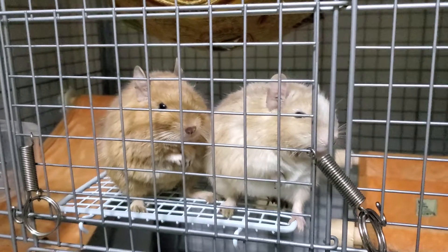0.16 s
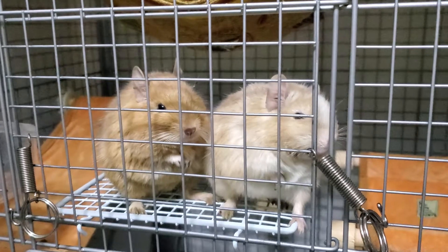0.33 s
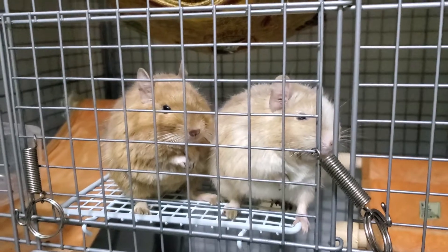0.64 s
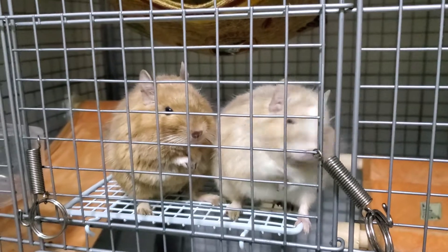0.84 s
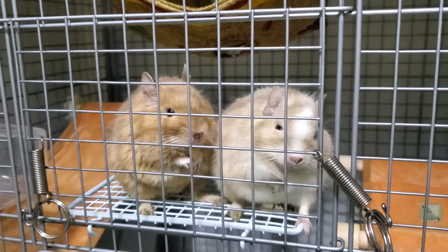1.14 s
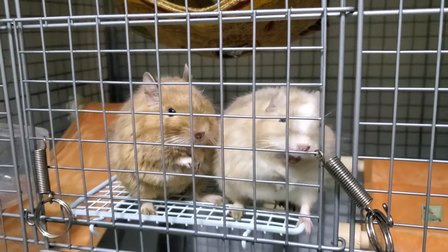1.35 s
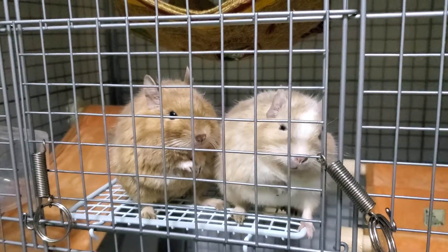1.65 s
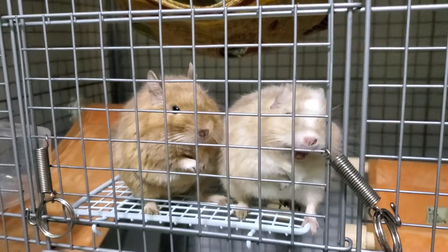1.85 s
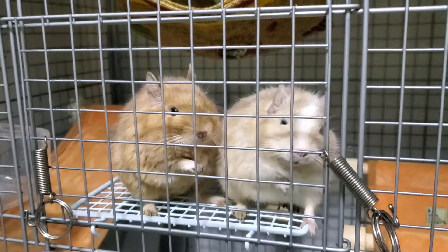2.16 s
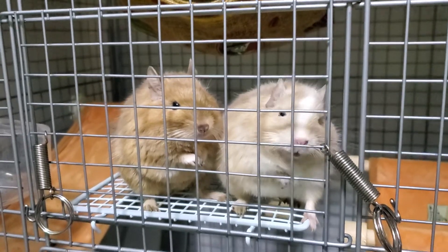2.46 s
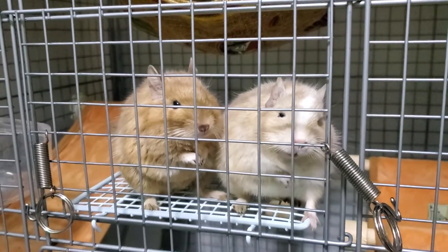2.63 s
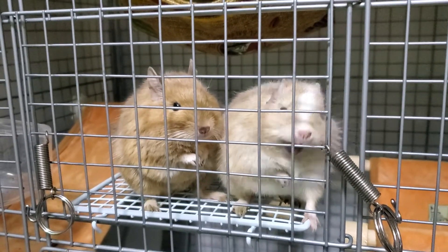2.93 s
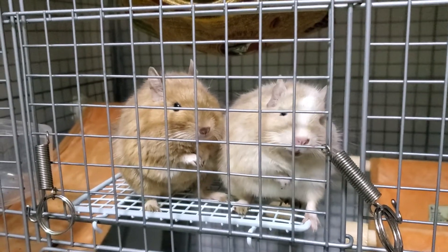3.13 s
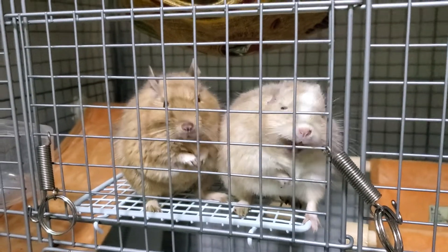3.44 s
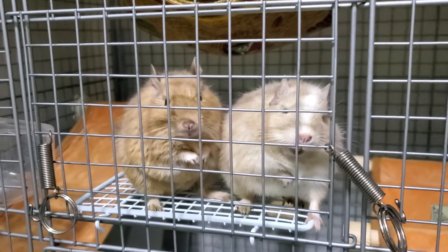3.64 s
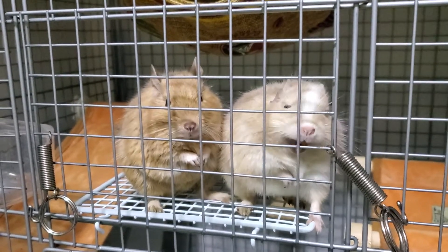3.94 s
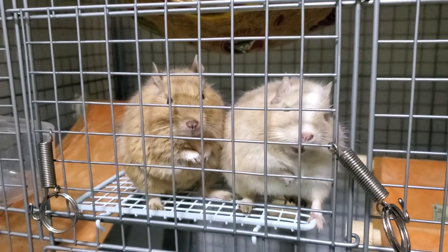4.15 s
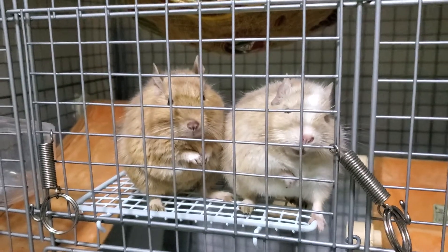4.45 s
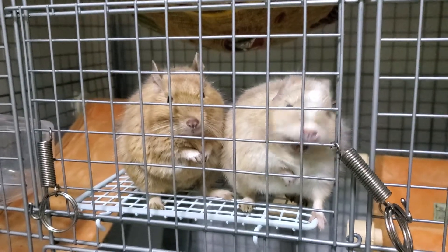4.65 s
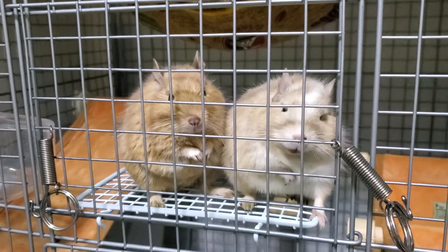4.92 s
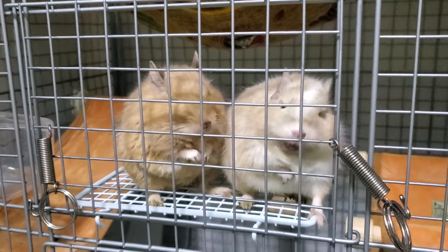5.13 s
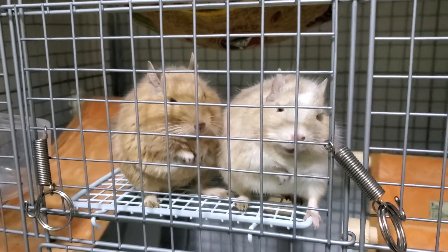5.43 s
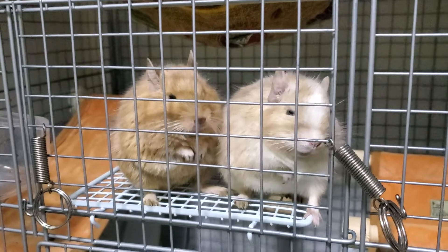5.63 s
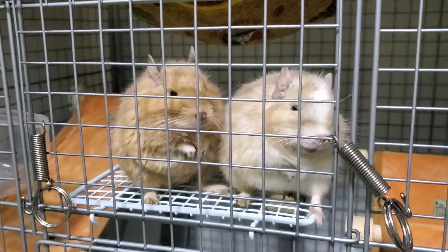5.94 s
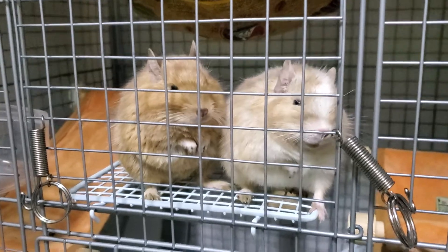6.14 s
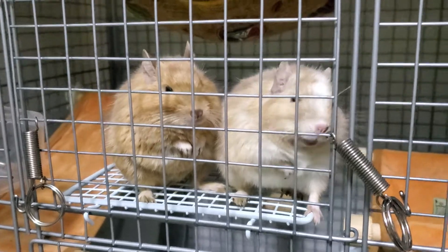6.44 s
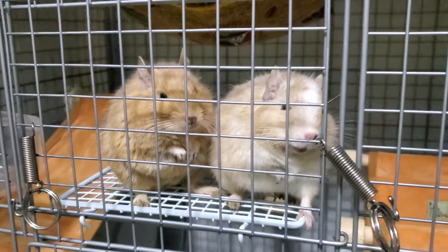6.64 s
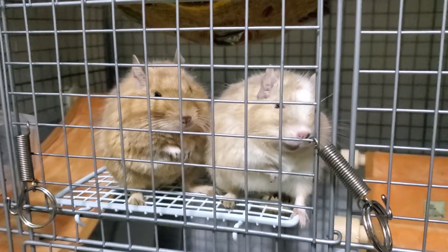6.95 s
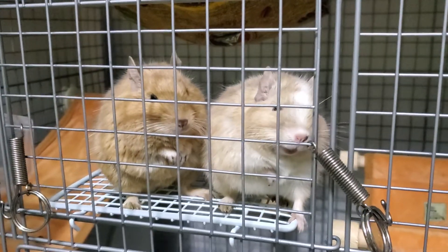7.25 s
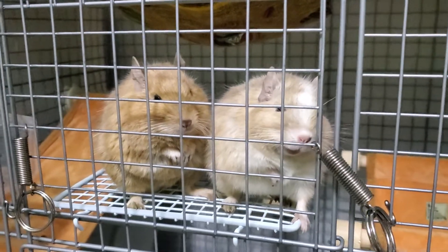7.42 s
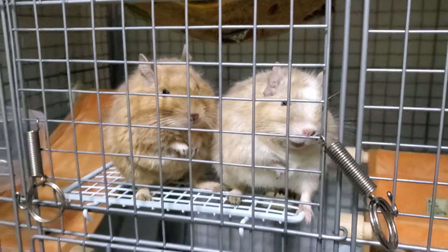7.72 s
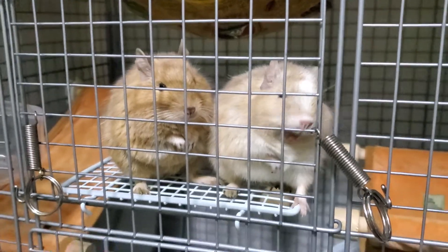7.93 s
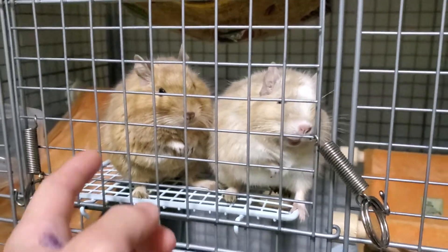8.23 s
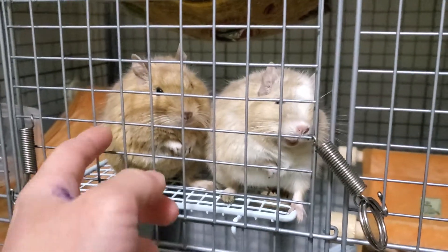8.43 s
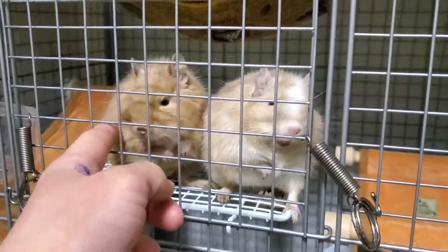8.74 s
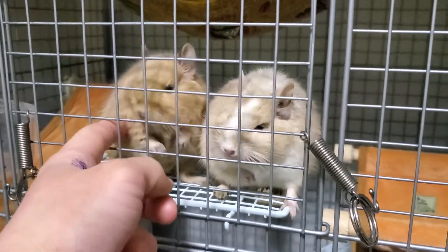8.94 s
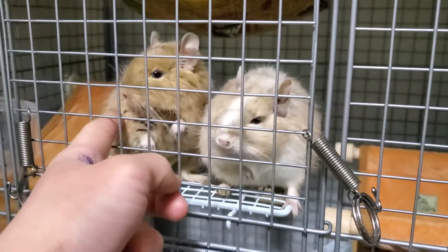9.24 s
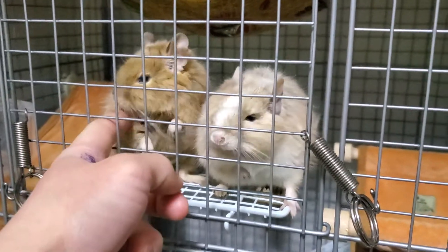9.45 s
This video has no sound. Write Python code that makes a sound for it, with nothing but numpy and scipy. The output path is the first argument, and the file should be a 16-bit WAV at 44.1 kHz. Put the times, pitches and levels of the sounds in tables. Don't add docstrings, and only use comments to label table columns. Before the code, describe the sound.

A small furry rodent in a wire cage squeaks again and again, close to a phone in a small room. Each squeak is a very short, high chirp that sweeps up, cracks roughly, whistles and drops, with a brief metallic and room echo. Between them come light claw ticks, soft shelf bumps, paw shuffling early on and slight fur rustles. A low mains hum and faint fan hiss run throughout.

```python
import sys
import numpy as np
from scipy import signal
from scipy.fft import rfft, irfft, next_fast_len
from scipy.io import wavfile
from scipy.ndimage import uniform_filter1d, map_coordinates

SR = 44100
rng = np.random.default_rng(int(sys.argv[2]) if len(sys.argv) > 2 else 0)


def master(y):
    cut = np.clip(np.atleast_2d(y).T, -1, 1)
    pcm = np.round(cut * 32767)
    wavfile.write(sys.argv[1], SR, pcm.astype(np.int16))


def gain_from_decibels(decibels):
    exponent = np.asarray(decibels, float) / 20
    return 10 ** exponent


N = 422478

# (start [s], sweep [s], hold [s], drop [s], bend of the sweep [power])
CALLS = [(-0.045, 0.043, 0.025, 0.04, 1.08), (0.743, 0.051, 0.024, 0.031, 1.02),
         (1.29, 0.0526, 0.036, 0.026, 0.66), (1.797, 0.038, 0.045, 0.028, 0.76),
         (2.267, 0.0331, 0.051, 0.022, 1.07), (2.933, 0.054, 0.035, 0.026, 0.65),
         (3.431, 0.048, 0.055, 0.021, 0.6), (3.922, 0.033, 0.057, 0.026, 0.86),
         (4.658, 0.047, 0.047, 0.022, 1.04), (5.133, 0.032, 0.071, 0.026, 0.83),
         (5.7385, 0.045, 0.061, 0.019, 0.62), (6.318, 0.039, 0.051, 0.022, 1.07),
         (6.978, 0.027, 0.078, 0.017, 1.08), (7.96, 0.035, 0.059, 0.04, 0.55),
         (8.543, 0.036, 0.051, 0.035, 0.94), (9.303, 0.032, 0.063, 0.018, 0.75)]
# (start [Hz], top of the sweep [Hz], mid hold [Hz], end of hold [Hz], last [Hz])
PITCHES = [(2400, 4530, 4510, 4630, 3430), (2666, 4830, 4370, 4610, 3530), (1760, 4920, 4750, 5080, 4010),
           (1870, 4510, 4570, 4770, 3820), (2580, 4670, 4970, 5430, 4500), (1587, 4770, 4340, 4850, 3440),
           (1480, 4190, 4440, 4280, 3300), (2003, 4150, 4620, 5120, 4100), (2308, 3800, 3750, 4300, 3300),
           (1840, 4050, 4120, 4730, 3600), (2280, 5000, 5030, 4960, 3700), (2230, 4830, 4930, 4860, 4180),
           (2174, 4100, 4620, 4700, 3400), (1887, 3980, 4320, 4420, 3200), (1595, 4260, 4140, 4440, 3340),
           (1876, 3800, 4620, 4740, 3470)]
# (depth [share of pitch, 0-1], period [s], first crest after the sweep [s])
QUAVERS = [(0.03, 0.015, 0.014), (0.033, 0.031, 0.0109), (0.01, 0.018, 0.00061), (0.02, 0.0191, 0.0104),
           (0.02, 0.035, 0.0199), (0.05, 0.0285, 0.0168), (0.03, 0.023, 0.0101), (0.02, 0.0223, -0.0075),
           (0.02, 0.0222, -0.0123), (0.012, 0.035, 0.031), (0.01, 0.032, -0.013), (0.022, 0.0302, 0.017),
           (0.02, 0.0321, -0.0044), (0.02, 0.024, 0.0311), (0.012, 0.018, 0.0128), (0.03, 0.032, 0.012)]
# (sweep [dB], top of the sweep [dB], mid hold [dB], end of hold [dB])
EFFORTS = [(-36, -25.5, -32.5, -29.5), (-25, -29, -26, -27.5), (-31.5, -27.5, -28.5, -23.5),
           (-26.5, -27.5, -26.5, -25.5), (-26.5, -23, -23, -15.5), (-27.5, -28.5, -27, -26.5),
           (-29, -27, -27, -28.5), (-26.5, -24, -21.5, -22), (-26, -19.5, -19, -24),
           (-29.5, -25.5, -24, -24), (-33, -23, -21, -23.5), (-31, -30, -27, -26.5),
           (-29, -27.5, -21, -25.5), (-28.5, -23, -25.5, -28), (-27, -24, -26, -27),
           (-31, -25.5, -25.5, -26.5)]
# (time after the start [s], gain [dB], width [s])
PUSHES = [(.07, 2.5, 0.00803), (.02, 1, 0.01), (0.019, 5, 0.0028), (0.025, 2.5, .006), (.085, 1, .006),
          (.025, 2, .008), (0.027, 5, .008), (.05, 2.5, .008), (0.0229, 2.5, .006), (0.0615, 2.5, .008),
          (0.074, -3.5, 0.006), (0.055, 6.5, .009), (.045, 4, 0.012), (.022, 5.5, .004),
          (0.026, -0.5, 0.0091), (0.078, 2, 0.0074)]
# (start [s], end [s], noise share [dB], second voice [Hz], its level [dB])
VOICE_BREAKS = [(-.01, 0.022, -9, 5960, -28.5), (.735, 0.774, -3.5, 5700, -12),
                (1.306, 1.327, -7.5, 5700, -22.5), (1.805, 1.815, 2, 5670, -13),
                (2.283, 2.302, 2.5, 5410, -5), (2.936, 2.967, -2.5, 5610, -26),
                (3.426, 3.461, -12, 5670, -16.5), (3.95, 3.984, -0.5, 5274, 2),
                (4.65, 4.739, -1, 5020, -8.5), (5.145, 5.188, -2, 5190, -9), (5.766, 5.786, -1, 5600, 1),
                (6.319, 6.354, -13, 5710, -29), (7.006, 7.052, -2, 5370, 6),
                (7.967, 8.009, -6.5, 6470, -2.5), (8.548, 8.586, 1, 5670, -29),
                (9.323, 9.358, -1, 5930, -13)]
# (depth [share of pitch, 0-1], lets go before the break ends [s])
DRAGS = [(0.01, .003), (0, .003), (.003, .003), (0, .003), (.06, 0.0036), (.003, .003), (0.01, .003),
         (.11, .01), (0.01, .003), (0.01, 0.00308), (.1, .007), (.003, .003), (.16, 0.00092),
         (0.01, 0.0032), (.003, .003), (0.02, 0.0034)]
# (second [dB], third and up [dB], loss per overtone before the mouth opens [dB], half-pitch strands [dB])
OVERTONE_LEVELS = [(0, 0, -1.5, -1.5), (0.5, -3, 1.5, 1), (1, 1, 4.5, -10.5), (1.5, 0.5, 1, -5),
                   (-0.5, -3, 3, -5), (1, 1, 4, -10), (3.5, 2, 0.5, 1.5), (1, -0.5, 3.5, -6),
                   (0.5, -3, 5, -1.5), (0.5, -2, 1.5, -6.5), (-.5, -2, 6, -3), (-1, -4, 6, -2),
                   (-1.5, 0, 6.5, -0.5), (1.5, 2.5, 3, 1), (-3, 1.5, 6, -8.5), (4, -1, 6, -0.5)]
CROAK_DB = [-23.5, -32.5, -37, -27.5, -44.5, -26.5, -36, -40, -29.5, -38.5, -46, -40, -53, -30, -26, -42]
CHEST_RESONANCES = [1800, 1900, 1803, 1800, 1800, 1750, 2100, 1750, 1250, 1900, 1700, 1800, 1850, 1630,
                    1720, 2100]
# (left-right [dB], left leads [microseconds], brightness [dB per octave])
HEAD_TURNS = [(-.5, -5, -2), (-.5, -25, -1.5), (.5, 0.46, -2), (0, -8, -2.5), (0, 0.5, -1), (.5, 3, -2),
              (.5, 1.5, -3), (.5, 0.5, -0.5), (0, -4, 0.5), (0, 0.5, -1), (0, -8, -2.5), (-.5, -11, -1.5),
              (-.5, 16, -2), (-1, 5, -1), (0, 21, -2.5), (2.5, 52, -2)]
# (frequency [Hz], gain [dB])
MOUTH_AND_THROAT = [(900, -46), (1800, -27), (3100, -15.5), (3800, -9.5), (5000, -4.5), (6200, 0),
                    (7400, -3), (8300, -5.5), (9500, -8), (11300, -3), (12700, -4.5), (15500, -8.5),
                    (19000, -9)]
# (frequency [Hz], left-right [dB], left leads [radians])
MIC_PORTS = [(2700, .5, -.2), (3600, 3, -.1), (5000, .5, .35), (5850, -2, 1.1), (7000, .5, 1.05),
             (8200, 4.5, 1.3), (10100, 4.5, 2.5), (11800, 1.5, 2.7), (14500, 3.5, 3.8)]
# (frequency [Hz], time to die by 60 dB [s])
CAGE_DECAY = [(3000, 0.097), (14000, 0.058)]
# (frequency [Hz], time to die by 60 dB [s])
WALL_DECAY = [(1000, 0.3), (5000, 0.26), (15000, 0.23)]
# (time [s], peak level [dB], tilt [dB per octave])
CLAW_AND_LIP_TICKS = [(1.2858, -55.5, -14), (0.65, -58, -4.5), (2.714, -60.5, -9), (2.736, -50, -12),
                      (2.7615, -37, -6), (3.412, -63.5, -2), (3.899, -58, -14), (4.343, -48, -12),
                      (4.408, -57, -10.5), (4.642, -60.5, -9), (5.103, -61.5, -15.5), (6.966, -69, -10.5),
                      (7.9312, -45.5, -6), (6.302, -68, -6), (5.66, -66, -4), (8.678, -60, -10),
                      (1.2, -64, -12), (1.8, -63, -17), (7.957, -49, -8)]
# (time [s], peak level [dB], pitch of the thud [Hz])
SHELF_BUMPS = [(0.753, -49, 436), (3.088, -53.5, 317), (3.147, -52, 320), (3.545, -57.5, 420),
               (3.999, -51, 339), (4.085, -61, 409), (4.72, -50.5, 490), (5.214, -53.5, 349.5),
               (6.399, -61, 330), (8.05, -54.5, 350), (8.617, -49.5, 340), (1.7, -43.5, 59),
               (2.34, -45.5, 65.2), (3.68, -53.5, 70), (7.04, -44.5, 53), (4.72, -47, 62),
               (2.95, -46.5, 104), (3.3, -52, 120), (6.38, -47.5, 64), (8.56, -46, 60), (9.34, -45, 60),
               (8.02, -47, 62), (5.8, -49.5, 62), (4.0, -50, 70)]
# (time [s], level [dB])
PAW_STROKES = [
    [(2.5, -83), (2.81, -64), (2.92, -83)],
    [(2.9, -71.5), (3.13, -66.5), (3.3, -82.5), (3.6, -72)],
    [(4.25, -76), (4.374, -72.5), (4.5, -77)],
]
# (frequency [Hz], level [dB per Hz])
PAW_COLOUR = [(88, -41), (150, 18), (352, -38), (381, 0), (490, -2), (3100, -4.5), (15500, -36)]
# (time [s], level [dB])
FUR_STROKES = [
    [(4.3, -95), (4.354, -66.5), (4.45, -86)],
    [(7.35, -102), (7.5, -75), (7.62, -74.5), (7.68, -82), (7.92, -88)],
    [(8.8, -89), (8.88, -90), (8.95, -99)],
]
# (frequency [Hz], level [dB per Hz])
FUR_COLOUR = [(2650, -31), (4500, -4), (5620, -3), (7430, -10), (11000, -1.5), (15500, -9)]
# (frequency [Hz], level [dB])
HUM_LINES = [(58.2, -57), (100, -62.5), (150, -72.5), (175, -72.5), (200, -69), (250, -70.5), (325, -78.5),
             (350, -73), (400, -83.5), (450, -82), (500, -72), (650, -83), (800, -80), (1394, -86)]
# (time [s], load [dB])
MOTOR_LOAD = [(0.0, 5), (0.59, -2.5), (1.12, 4.5), (2.0, -2.5), (2.8, 2.5), (4.64, -1.5), (6.72, -2.5),
              (8.38, 2), (9.58, -5.5)]
# (frequency [Hz], level [dB per Hz])
DRONE_COLOUR = [(24, -30.5), (40, 2.5), (88, -1), (146, -11.5), (343, -17), (416, -23.5), (497, -27.5),
                (557, -20), (794, -23.5), (996, -33.5), (1900, -34), (2470, -72), (4180, -120)]
# (frequency [Hz], level [dB per Hz])
FAN_COLOUR = [(880, -41.5), (1500, -19.5), (1970, -19), (2640, -0.5), (3380, -5), (3580, -12.5),
              (4230, -16), (5670, -26), (8290, -31), (12300, -23.5), (15500, -26)]
# (frequency [Hz], likeness [-1 to 1])
PORT_LIKENESS = [(60, 0.92), (130, 0.8), (290, 0.6), (640, 0.35), (1410, -0.21), (3100, 0.14), (6820, 0.04),
                 (15000, -0.0)]
# (frequency [Hz], left-right [dB])
PORT_BALANCE = [(60, 0.5), (150, 1.5), (380, 5.0), (950, 8.5), (2380, -2.0), (5980, 2.0), (15000, 1.0)]

TOP_HZ = 15850
SMOTHER_HZ = 3720


def unit(x):
    return x / np.sqrt(np.mean(x ** 2) + 1e-20)


def along(points, hz, col=1):
    rows = np.transpose(points)
    return np.interp(np.log(hz + 1), np.log(rows[0] + 1), rows[col])


def curves(rows, t):
    s, *cols = np.transpose(rows)
    return [np.interp(t, s, c) for c in cols]


def wobble(rate, size=N):
    knots = rng.standard_normal(int(size * rate / SR) + 4)
    return map_coordinates(knots, [np.arange(size) * rate / SR])


def filtered(x, response):
    m = next_fast_len(x.shape[-1] + 4096)
    spectrum = rfft(x, m) * response(np.fft.rfftfreq(m, 1 / SR))
    return irfft(spectrum, m)[..., :x.shape[-1]]


def spread(db, lead):
    half = gain_from_decibels(db / 2) * np.exp(.5j * lead)
    return np.array([half, 1 / half])


def add(track, x, s):
    at = round(s * SR)
    x = x[:, max(-at, 0):]
    part = track[:, max(at, 0):][:, :x.shape[1]]
    part += x[:, :part.shape[1]]


def rush(spectrum, patchy_db):
    z = signal.stft(rng.standard_normal((2, N)), nperseg=512)[2]
    field = uniform_filter1d(rng.standard_normal(z.shape[1:]), 6, 0)
    field = uniform_filter1d(field, 12, 1)
    pair = signal.istft(z * gain_from_decibels(patchy_db * unit(field)), nperseg=512)[1][:, :N]

    def mid_side(hz):
        turn = np.arccos(np.clip(along(PORT_LIKENESS, hz), -1, 1)) / 2
        return gain_from_decibels(along(spectrum, hz)) * [np.cos(turn), np.sin(turn)]

    mid, side = filtered(pair, mid_side)
    both = np.array([mid + side, mid - side])
    both = filtered(both, lambda hz: spread(along(PORT_BALANCE, hz), 0))
    return both / np.sqrt(np.mean(both.mean(0) ** 2))


def tail(decays, seconds, wait):
    hz, t, z = signal.stft(rng.standard_normal((2, int(seconds * SR))), SR, nperseg=64)
    dying = gain_from_decibels(-60 * t / along(decays, hz)[:, None])
    echo = signal.istft(z * dying, SR, nperseg=64)[1]
    return np.pad(echo / np.linalg.norm(echo[0]), ((0, 0), (int(wait * SR), 0)))


def rodent():
    out = np.zeros((2, N))
    for call, pitch, quaver, effort, push, broken, drag, overtones, croak_db, chest_hz, head in zip(
            CALLS, PITCHES, QUAVERS, EFFORTS, PUSHES, VOICE_BREAKS, DRAGS, OVERTONE_LEVELS,
            CROAK_DB, CHEST_RESONANCES, HEAD_TURNS):
        start = call[0]
        pan_db, lead_us, bright_db = head
        t, hz, db = contour(call, pitch, quaver, effort, push)
        voice = squeal(t, hz, db, broken, bright_db, croak_db, overtones, drag, chest_hz)

        def ports(f):
            lead = along(MIC_PORTS, f, col=2) + 2 * np.pi * f * lead_us / 10 ** 6
            return spread(along(MIC_PORTS, f) + pan_db, lead)

        direct = filtered(voice, ports)
        cage = signal.fftconvolve(voice[None], tail(CAGE_DECAY, .15, wait=.002), axes=1)
        walls = signal.fftconvolve(voice[None], tail(WALL_DECAY, 0.82, wait=.006), axes=1)
        add(out, direct, start)
        add(out, gain_from_decibels(-11) * direct, start + .0075)
        add(out, gain_from_decibels(-6.5) * cage, start)
        add(out, gain_from_decibels(-23.0) * walls, start)
    return out


def contour(call, pitch, quaver, effort, push):
    start, sweep, hold, drop, bend = call
    depth, period, lag = quaver
    first, top, middle, crest, last = pitch
    s = np.arange(0, sweep + hold + drop, 1 / SR)
    up = np.clip(s / sweep, 0, 1)
    held = np.clip((s - sweep) / hold, 0, 1)
    down = np.clip((s - sweep - hold) / drop, 0, 1)
    hz = first + (top - first) * up ** bend + (crest - top) * held
    hz -= (crest - last) * down ** 1.45
    hz += (middle - (top + crest) / 2) * 4 * held * (1 - held)
    hz *= 1 + depth * up ** 4 * (1 - down) * np.cos(2 * np.pi * (s - sweep - lag) / period)
    attack_s, attack_db = .013, 14
    close_s, close_db = .008, 12
    drop_db = effort[-1] - 9
    when = [0, attack_s, sweep, sweep + hold / 2, sweep + hold, s[-1] - close_s, s[-1]]
    level_db = [effort[0] - attack_db, *effort, drop_db, drop_db - close_db]
    push_s, push_db, push_width = push
    db = np.interp(s, when, level_db)
    db += push_db * np.exp(-((s - push_s) / push_width) ** 2)
    db += 0.65 * up * wobble(90, size=len(s))
    return start + s, hz, db


def squeal(t, hz, db, broken, bright_db, croak_db, overtones, drag, chest_hz):
    size = len(t)
    hz = uniform_filter1d(hz, 60, mode="nearest")
    db = uniform_filter1d(db, 60, mode="nearest")
    start, end, noise_db, second_hz, second_db = broken
    inside = np.clip(np.minimum((t - start) / 0.0032, (end - t) / 0.0027) + 1, 0, 1)
    air_db = np.where(t < start, -16, -23.5)
    chaos = np.clip(gain_from_decibels(air_db + inside * (noise_db - 1 - air_db)), 0, .8)
    dragged = 1. * (t > start + .005) * (t < end - drag[1])
    dragged = uniform_filter1d(dragged, 500, mode="nearest")
    jitter = 0.0049 * wobble(120, size) + .015 * chaos * wobble(500, size)
    hz = hz * (1 - drag[0] * dragged) * (1 + jitter)
    other = second_hz + 7500 * (t - start)
    other = other * (1 + 0.006 * wobble(250, size))
    second_voice_db = second_db - 45 * (1 - inside)

    def colour(f):
        return along(MOUTH_AND_THROAT, f) + bright_db * np.log2(f / 5000 + 0.13)

    slope_db = -0.5 + 0.54 * (db + 26.5) * (t > end)
    tone = voices(t, hz, other, chaos, second_voice_db, slope_db, overtones[:3], colour)
    rough = rasp(hz, overtones[3], colour)
    low = croak(t, hz, croak_db, chest_hz)
    edges = np.clip(np.minimum((t - t[0]) / 0.0013, (t[-1] - t) / 0.0025), 0, 1)
    return gain_from_decibels(db - 1.2) * edges * (np.sqrt(1 - chaos ** 2) * tone + chaos * rough + low)


def voices(t, hz, other, chaos, second_voice_db, slope_db, overtones, colour):
    pairs = [(k, j) for j in range(3) for k in range(-1, 9) if k + 2 * j > 0]
    k, j = np.transpose(pairs)[:, :, None]
    clean = j == 0
    at = np.abs(k * hz + j * other)
    mixed_db = second_voice_db - 5 * np.abs(k) - 13 * (k < 0) - 6 * (j - 1)
    clean_db = slope_db * np.log2(np.abs(k) + j) - 1.6 * np.maximum(k - 3, 0)
    source_db = np.where(clean, clean_db, mixed_db)
    twice_db, thrice_db, closed_db = overtones
    closed = np.clip(1 - (t - t[0]) / .026, 0, 1)
    shut = np.clip(1 - (t[-1] - t) / .03, 0, 1)
    mouth_db = (closed_db * closed + 9 * shut) * np.maximum(k - 2, 0)
    source_db = source_db + clean * (twice_db * (k == 2) + thrice_db * (k > 2) - mouth_db)
    smother_db = 16 * chaos * np.clip((SMOTHER_HZ - hz) / 300, 0, 1)
    source_db = source_db - smother_db * (k == 1) * clean
    size = gain_from_decibels(source_db + colour(at)) * (at < TOP_HZ + 2000)
    size = size / np.sqrt(np.sum(size ** 2, 0) / 2)
    low = (k == 1) * np.clip((SMOTHER_HZ - hz) / 600, 0, 1)
    flutter_db = 1.03 + 2.5 * chaos * clean + 4.7 * low + 2.5 * (k > 2) * closed ** .3
    shaking = np.array([wobble(380, len(t)) for _ in k])
    flutter = gain_from_decibels(flutter_db * shaking - 2.6 * low)
    turn = 2 * np.pi * (k * np.cumsum(hz) + j * np.cumsum(other)) / SR
    return np.sum(size * flutter * np.sin(turn + rng.uniform(0, 2 * np.pi, k.shape)), 0)


def rasp(hz, half_db, colour):
    size = len(hz)
    bursts = gain_from_decibels(1.6 * wobble(600, size)) * rng.standard_normal(size)

    def air_colour(f):
        tilt_db = 0.5 * np.log2(f / 5000 + 0.11)
        return gain_from_decibels(colour(f) + tilt_db) * (0.31 + 1 / (1 + (3300 / (f + 1)) ** 5))

    air = unit(filtered(bursts, air_colour))
    half = np.arange(1, 6)[:, None] + .5
    strand_db = colour(half * hz) + 2.5 * np.array([wobble(170, size) for _ in half])
    turn = 2 * np.pi * half * np.cumsum(hz) / SR + .8 * wobble(300, size)
    strands = gain_from_decibels(strand_db) * (half * hz < TOP_HZ) * np.sin(turn)
    return unit(air + gain_from_decibels(half_db) * unit(strands.sum(0)))


def croak(t, hz, level_db, chest_hz):
    size = len(t)
    fading_db = level_db - 20 * (t - t[0]) / 0.1 + 1.5 * wobble(180, size)
    turn = np.pi * np.cumsum(hz * (1 + 0.099 * wobble(500, size))) / SR
    width = 620
    chest = lambda f: 1.4j * f * width / (chest_hz ** 2 - f * f + 1j * f * width)
    return filtered(gain_from_decibels(fading_db) * np.sin(turn), chest)


def knocks():
    out, t = np.zeros((2, N)), np.arange(SR // 5) / SR
    for s, db, tilt_db in CLAW_AND_LIP_TICKS:
        snap = rng.standard_normal(len(t)) + 0.9 * rng.standard_normal((2, len(t)))
        snap = snap / np.sqrt(np.mean(snap[:, :30] ** 2) / 2)
        dying = gain_from_decibels(-60 * t / 0.0055) + gain_from_decibels(-17.5 - 60 * t / .07)
        hard = lambda f: f * f / (f * f + 3500 ** 2) * gain_from_decibels(tilt_db * np.log2(f / 6000 + 0.15))
        add(out, gain_from_decibels(db) * filtered(snap * dying, hard), s)
    for s, db, hz in SHELF_BUMPS:
        shelf = lambda f: f * hz / (hz * hz - f * f + 1j * f * hz * 0.59)
        thud = unit(filtered(rng.standard_normal(len(t)), shelf))
        swell = gain_from_decibels(db - 11.5 - 60 * t / 0.97) * np.minimum(t / 0.014, 1)
        add(out, swell * thud * gain_from_decibels([[1.5], [-1.5]]), s)
    return out


def rustle(strokes, spectrum, lift_db, grain_db, patchy_db):
    t = np.arange(N) / SR
    noise = rush(spectrum, patchy_db)
    gain = np.zeros(N)
    for rows in strokes:
        fade = np.clip(np.minimum(t - rows[0][0], rows[-1][0] - t) / 0.011, 0, 1)
        gain += fade * gain_from_decibels(curves(rows, t)[0] + lift_db)
    return gain * gain_from_decibels(grain_db * wobble(60)) * noise


def paws_and_fur():
    paws = rustle(PAW_STROKES, PAW_COLOUR, lift_db=7, grain_db=1.5, patchy_db=3)
    fur = rustle(FUR_STROKES, FUR_COLOUR, lift_db=1.0, grain_db=0.5, patchy_db=1.2)
    return paws + fur


def appliance():
    t = np.arange(N) / SR
    load_db, = curves(MOTOR_LOAD, t)
    beat_db = 4.5 * np.cos(2 * np.pi * (t - 1.4) / 3.63)
    port_gap_s = .0003
    hum = np.zeros((2, N))
    for hz, db in HUM_LINES:
        if hz < 80:
            swell_db = load_db
        elif abs(hz - 200) < 9:
            swell_db = beat_db
        else:
            swell_db = .8 * wobble(.5)
        gap = port_gap_s * np.array([[np.pi], [-np.pi]])
        drift = .0004 * np.array([wobble(0.41), wobble(0.79)])
        turn = 2 * np.pi * hz * t + 0.32 * wobble(5) + rng.uniform(0, 2 * np.pi) + hz * (gap + drift)
        gain = gain_from_decibels(np.array([[.5], [-.5]]) * along(PORT_BALANCE, hz) + swell_db)
        level = gain_from_decibels(db + 0.24 * wobble(1.7) + 1.2 * wobble(6.3))
        hum += np.sqrt(2) * gain * level * np.sin(turn)
    drone = gain_from_decibels(-58 + .6 * wobble(2.2)) * rush(DRONE_COLOUR, patchy_db=1.97)
    fan = gain_from_decibels(-71.5) * rush(FAN_COLOUR, patchy_db=1.64)
    return hum + drone + fan


def scene():
    return rodent() + knocks() + paws_and_fur() + appliance()


def roll_off(x):
    return signal.sosfilt(signal.butter(12, 16770, fs=SR, output="sos"), x)


def record(dry):
    band = lambda hz: 1 / (1 + (40 / (hz + 1)) ** 6) / (1 + (hz / TOP_HZ) ** 160)
    return roll_off(filtered(dry, band))


dry = scene()
out = record(dry)
master(out)
```